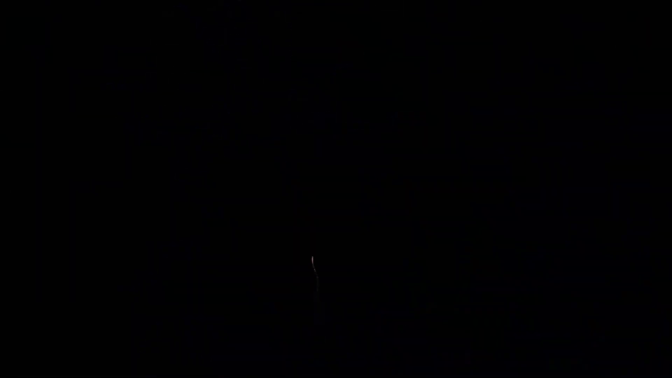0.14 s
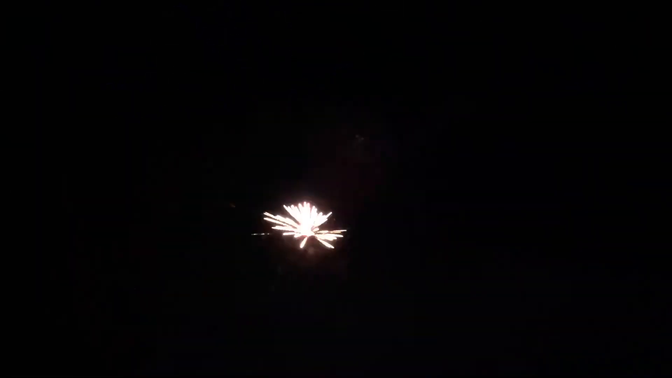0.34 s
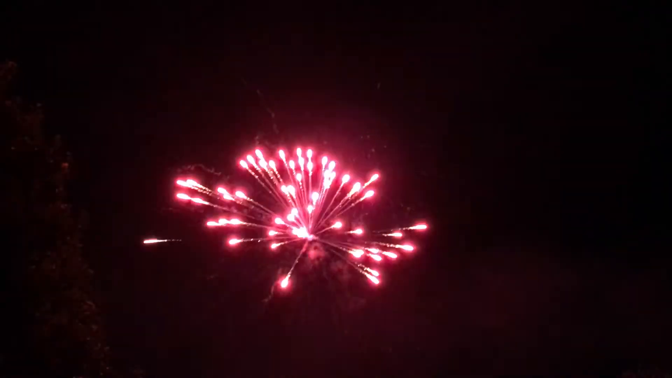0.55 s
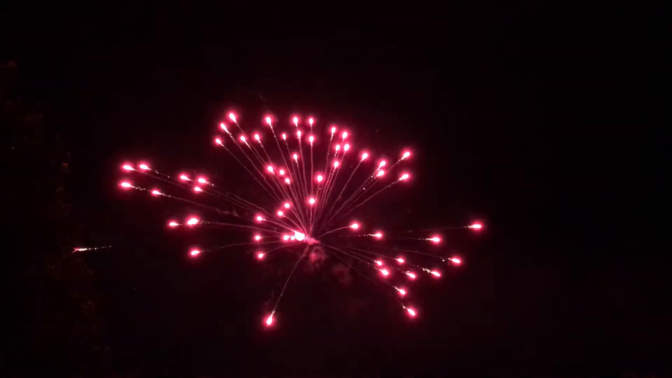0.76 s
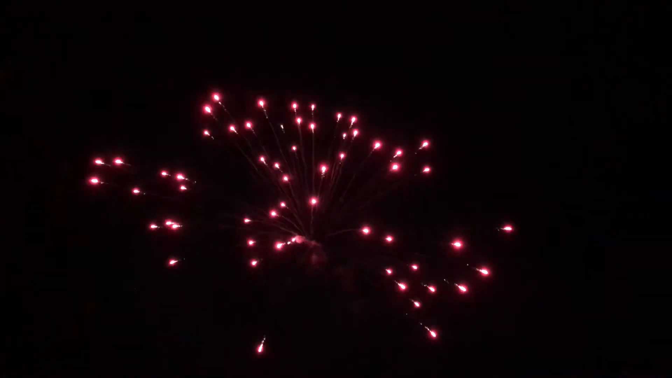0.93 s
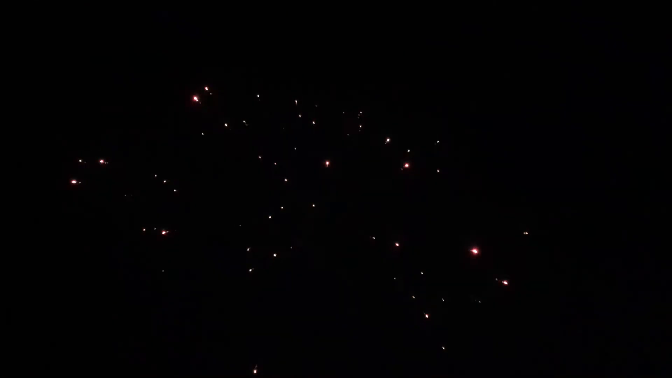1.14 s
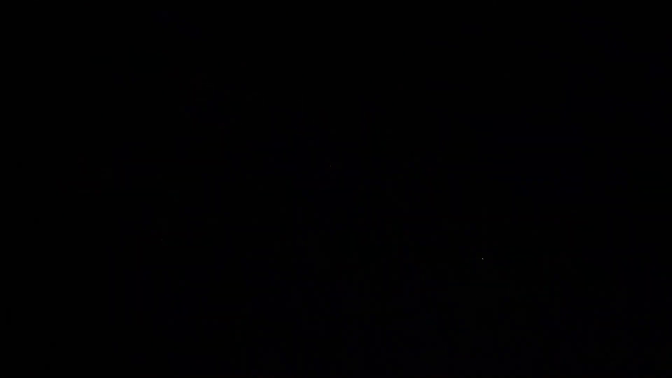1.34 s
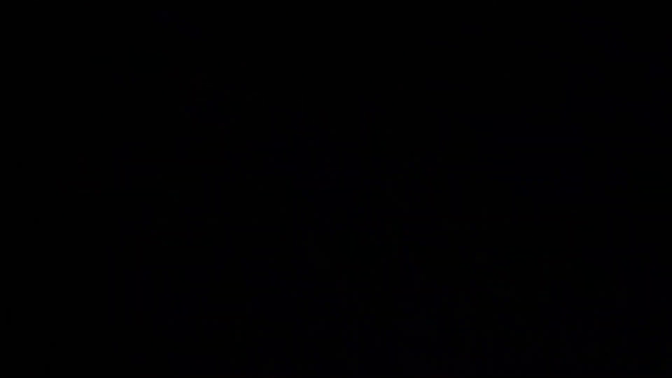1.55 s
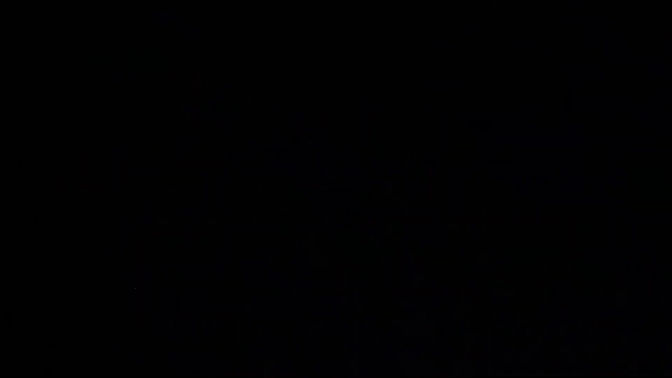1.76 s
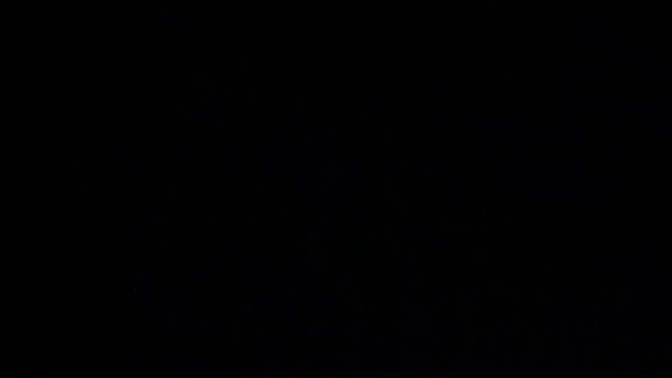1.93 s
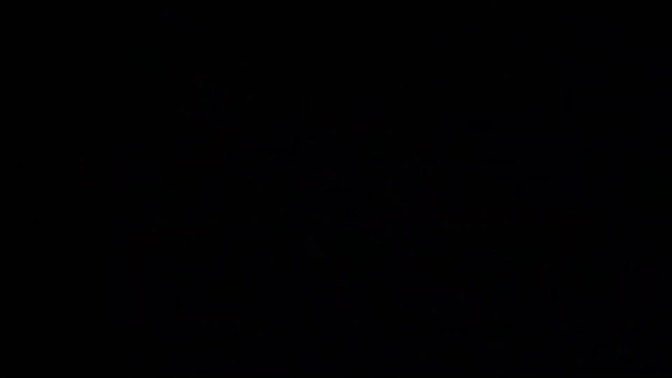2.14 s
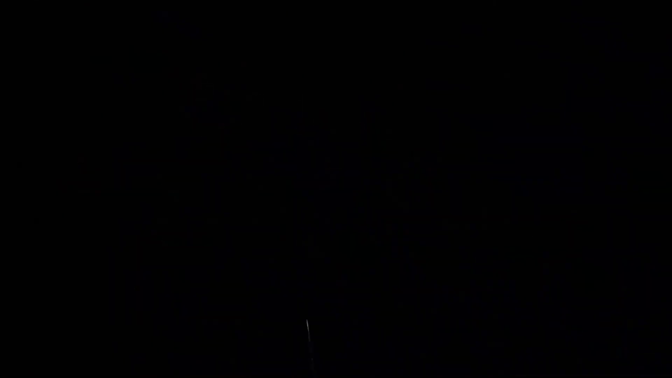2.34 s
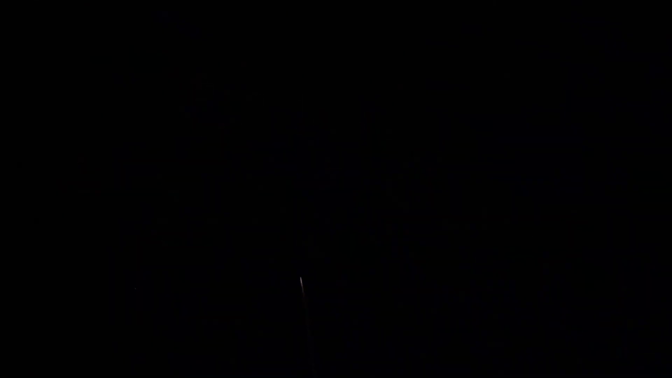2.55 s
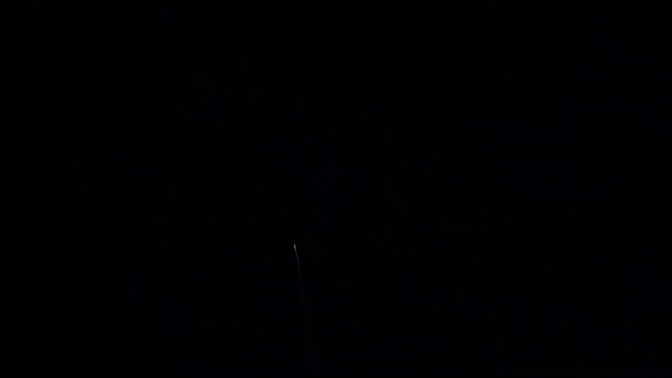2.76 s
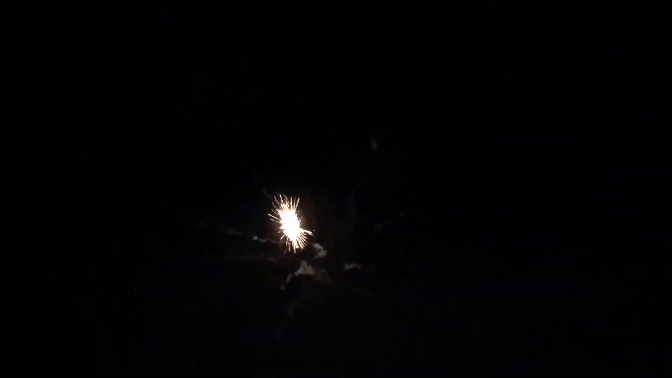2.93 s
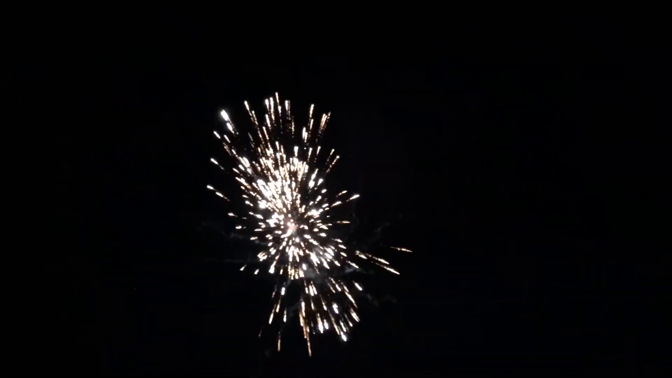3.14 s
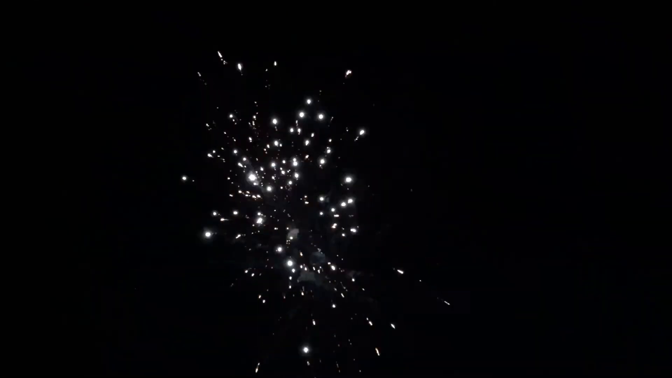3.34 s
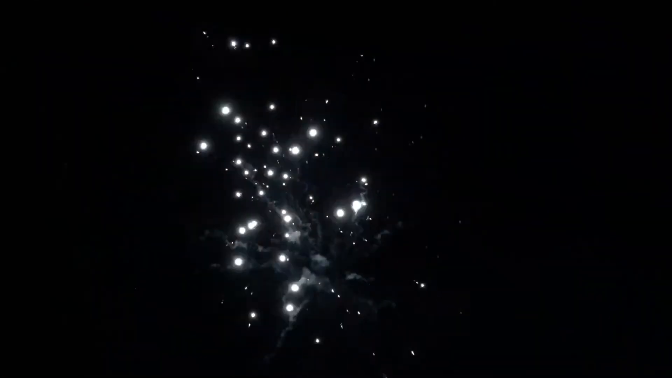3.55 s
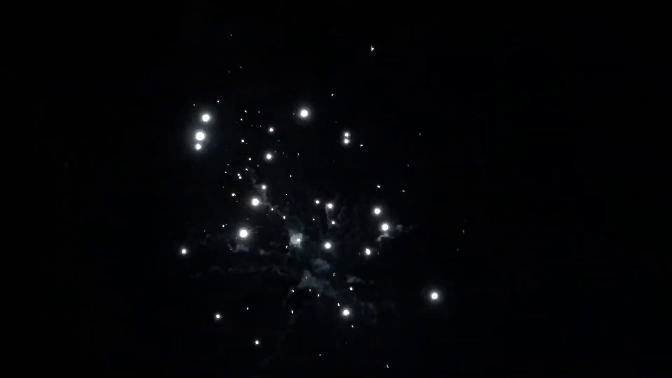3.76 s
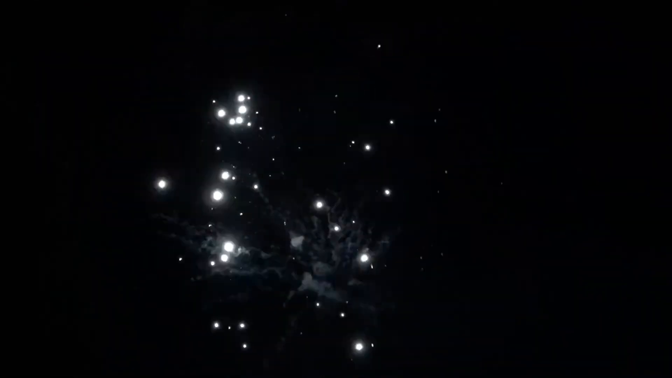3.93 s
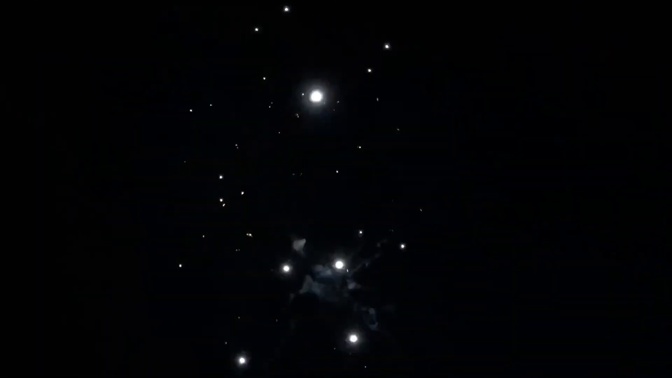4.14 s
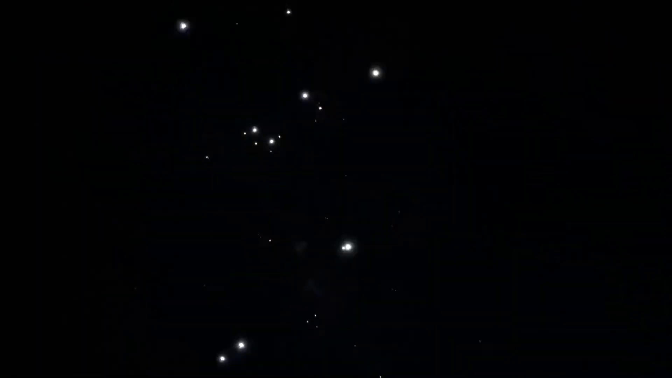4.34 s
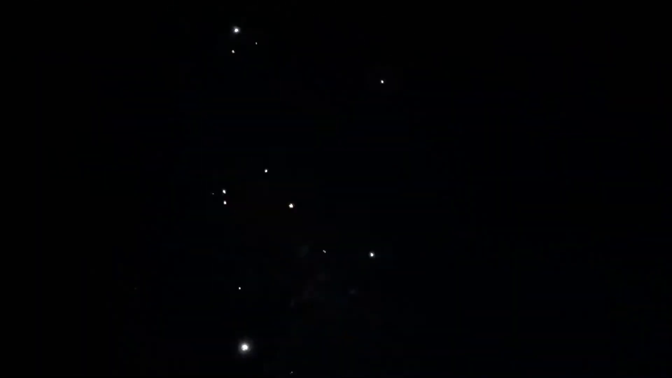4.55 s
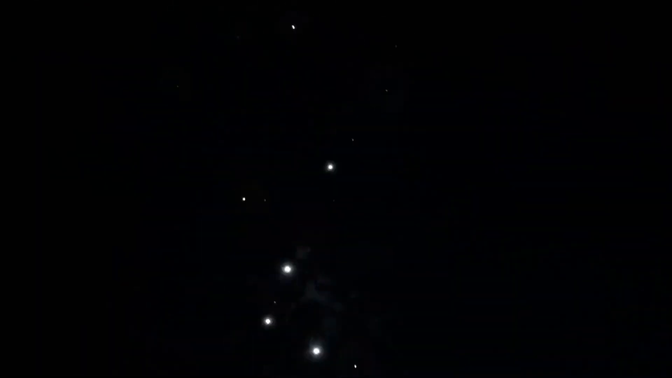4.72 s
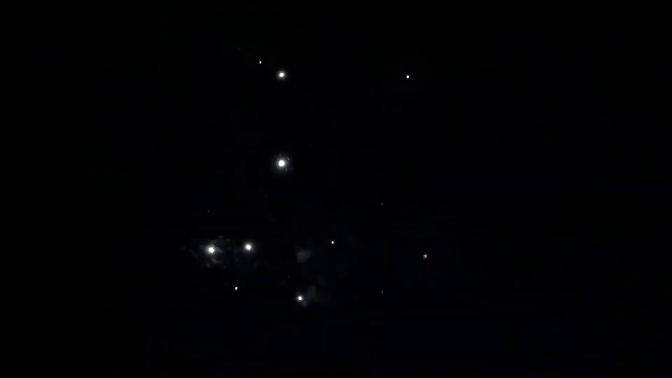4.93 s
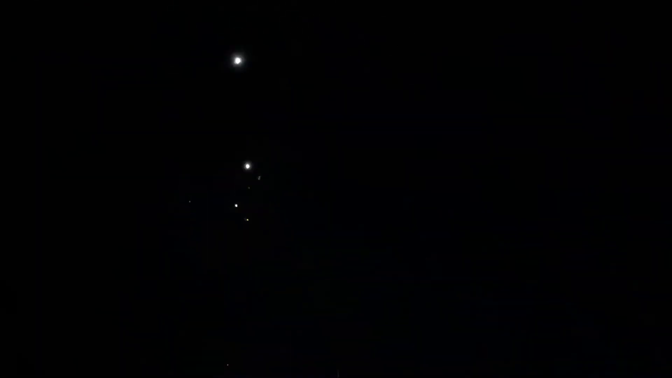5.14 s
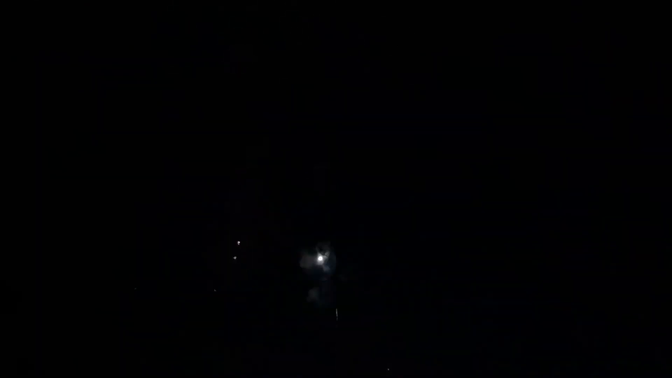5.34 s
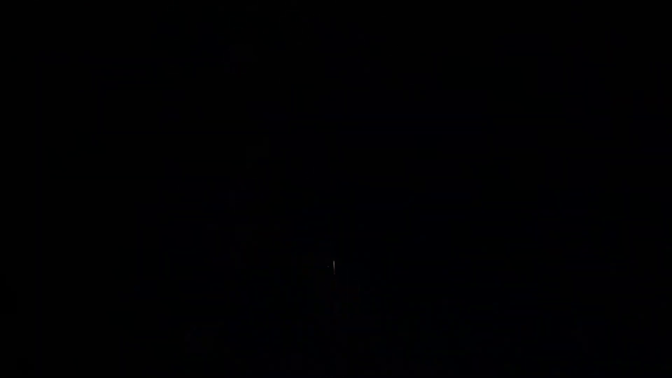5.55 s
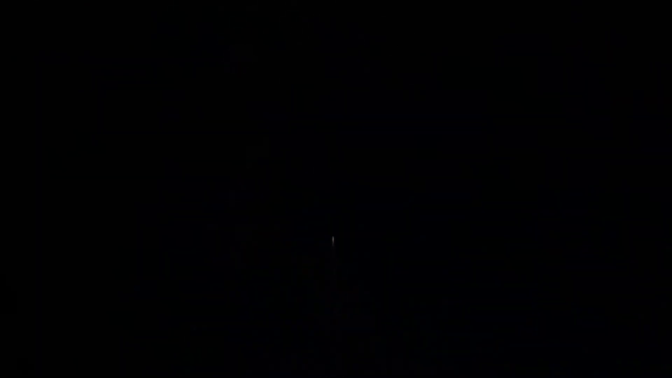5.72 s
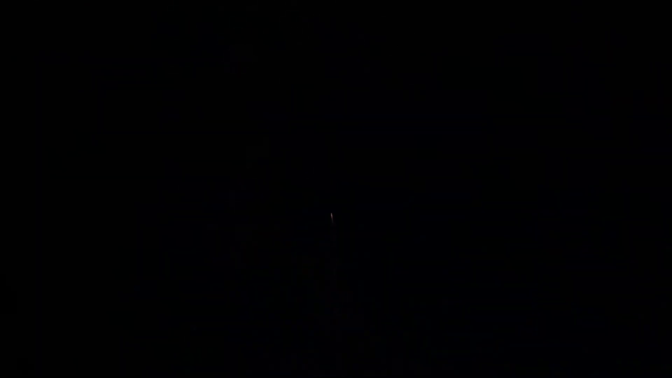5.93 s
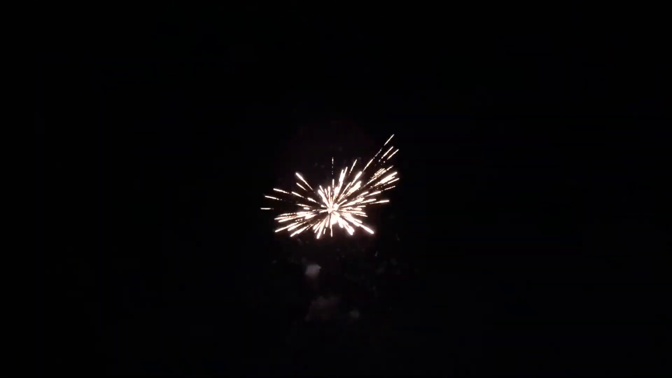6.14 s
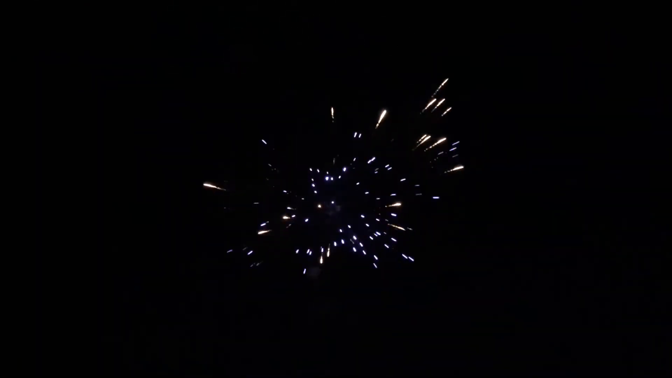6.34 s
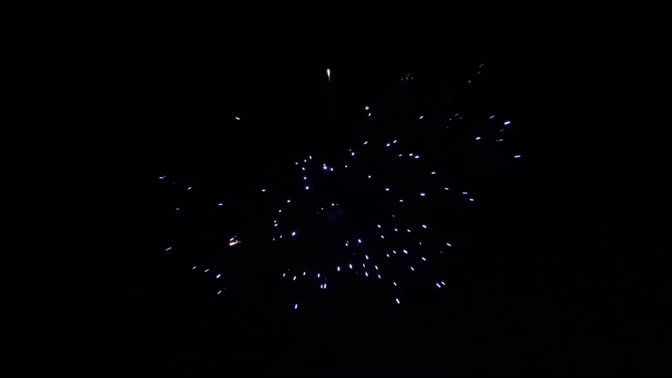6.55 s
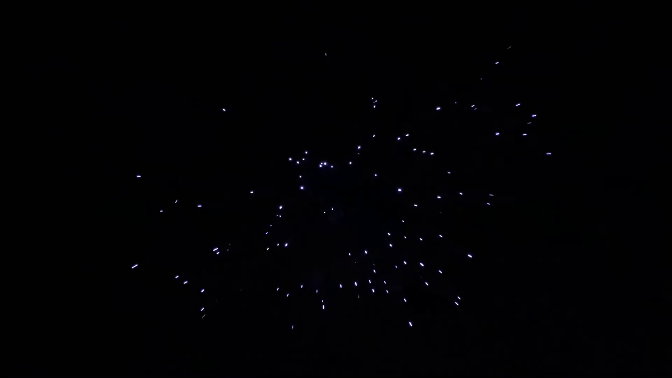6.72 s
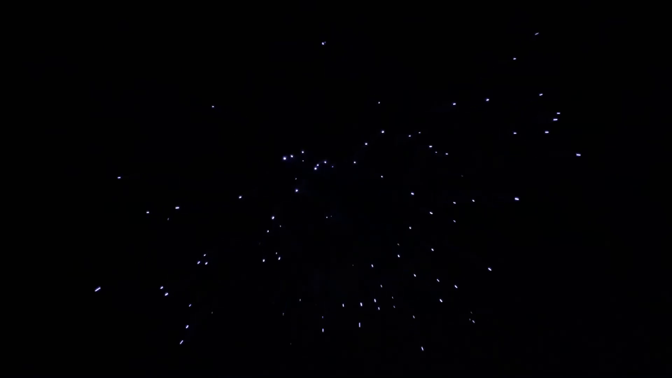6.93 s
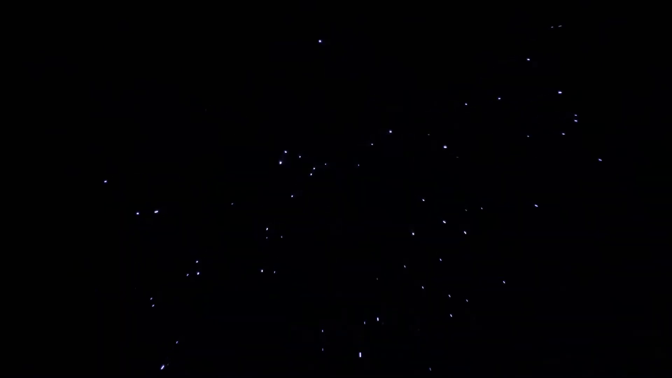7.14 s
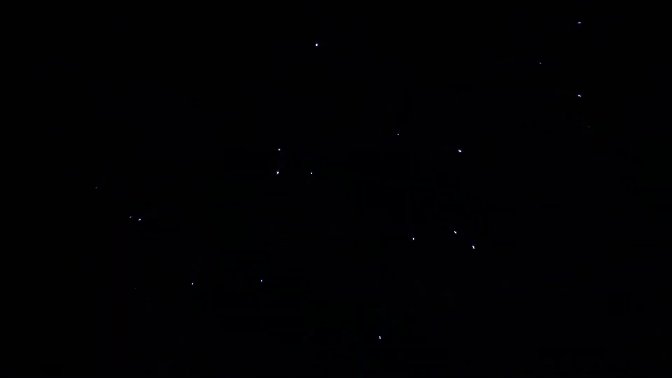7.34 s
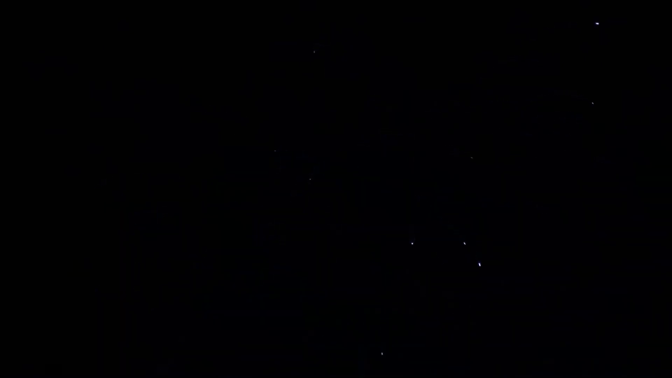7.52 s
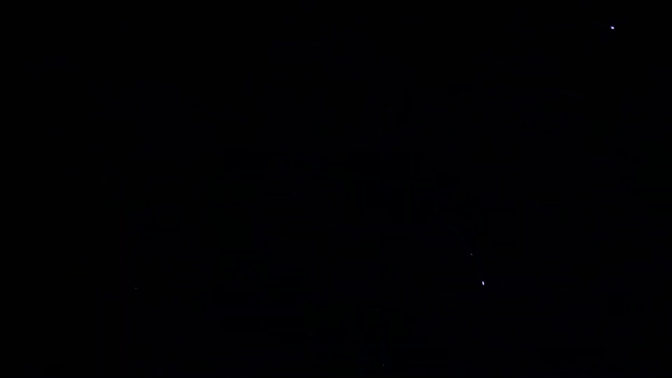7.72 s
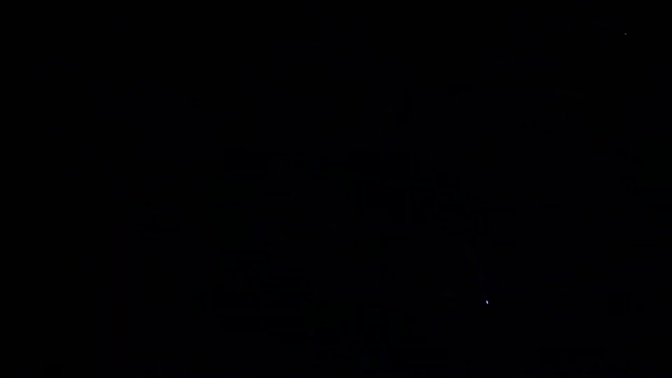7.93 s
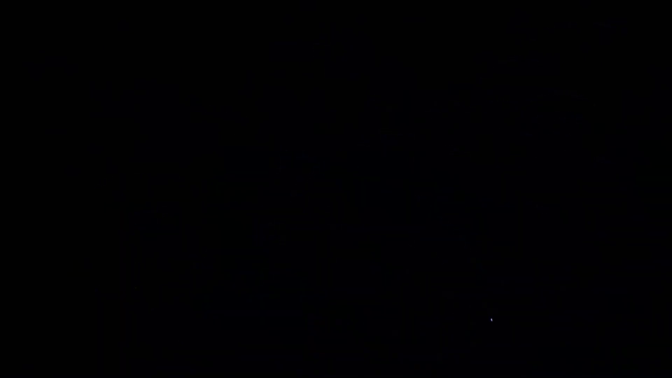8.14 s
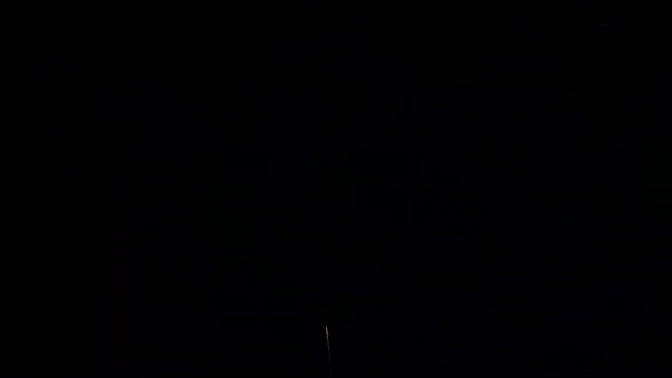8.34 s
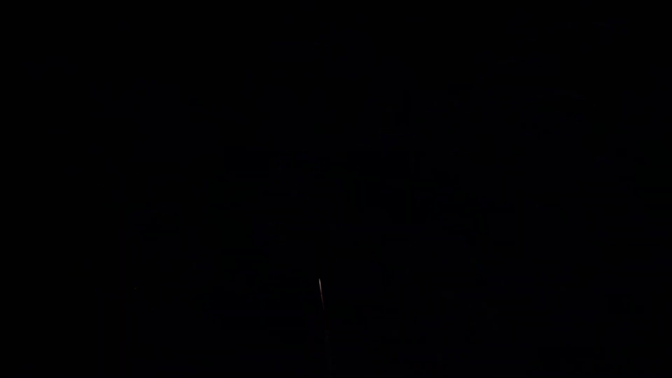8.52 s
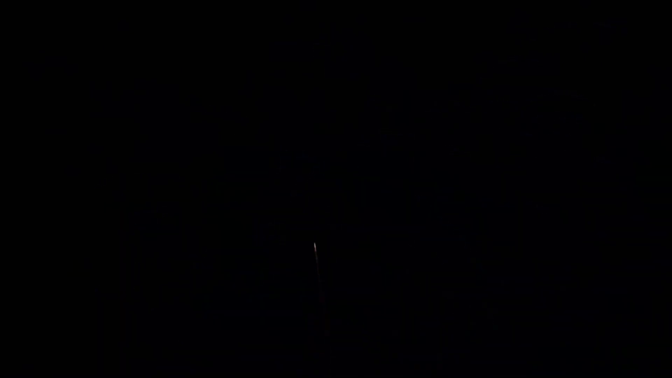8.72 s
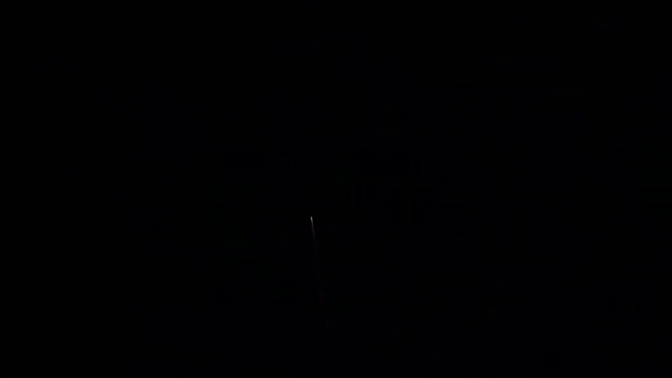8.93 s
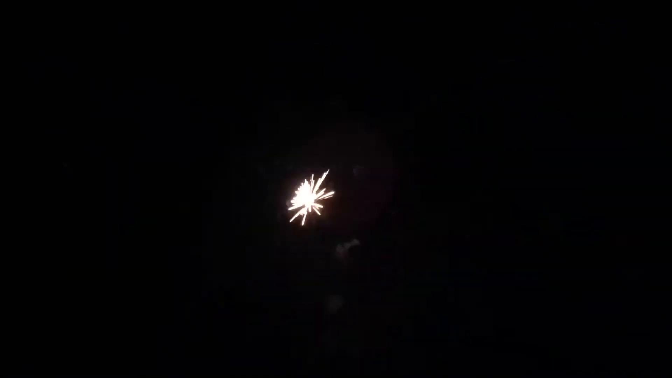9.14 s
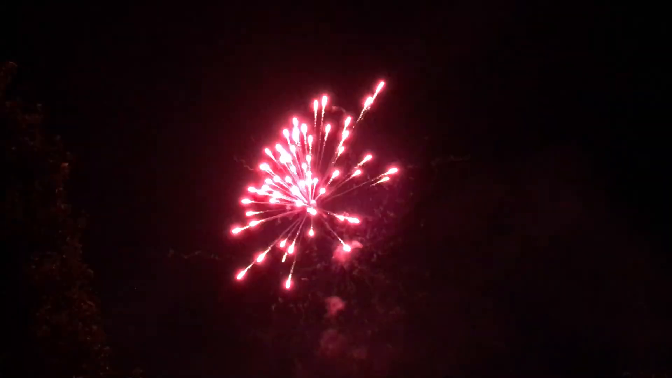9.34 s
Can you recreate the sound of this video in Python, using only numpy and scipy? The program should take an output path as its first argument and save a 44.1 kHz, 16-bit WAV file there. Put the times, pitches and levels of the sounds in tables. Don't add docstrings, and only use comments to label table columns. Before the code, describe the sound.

A fireworks cake fires outdoors at night. Four shells burst about three seconds apart, each a sharp crack with a deep boom and short roar, then rolling echoes from houses and trees. Between them come three hard, dry launch thumps with a wall slap. Distant fireworks thud softly, and bits of ash tick. A single-channel microphone overloads on peaks, and its faint hiss dips after every burst.

```python
import sys
import numpy as np
from scipy import signal
from scipy.io import wavfile
from scipy.ndimage import uniform_filter1d

SR = 44100
rng = np.random.default_rng(int(sys.argv[2]) if len(sys.argv) > 2 else 0)


def undo_db(level):
    steps = np.asarray(level, float) / 20
    return 10 ** steps


def output_pcm(signal):
    pcm = np.clip(np.atleast_2d(signal).T, -1, 1) * 32767
    wavfile.write(sys.argv[1], SR, np.round(pcm).astype(np.int16))


N = 418068


def evened(x):
    return x / np.sqrt(np.mean(x ** 2) + 1e-20)


def read_curve(points, hz):
    f, value = np.transpose(points)
    return np.interp(np.log(hz + 1), np.log(f + 1), value)


def add(mix, s, sound):
    part = mix[round(s * SR):][:len(sound)]
    part += sound[:len(part)]


def smooth_twice(x, size):
    return uniform_filter1d(uniform_filter1d(x, size), size)


def ring(hz, t60, count=6000):
    t = np.arange(count) / SR
    return np.sin(2 * np.pi * hz * t) * undo_db(-60 * t / t60)


def snap(hz):
    t = (np.arange(88) - 44) / SR
    body = (np.pi * hz * t) ** 2
    edge = (np.pi * 2.5 * hz * t) ** 2
    return .75 * (2 * body - 1) * np.exp(-body) + .32 * (2 * edge - 1) * np.exp(-edge)


def puff(hz, spread, t60):
    band = signal.butter(3, [hz / spread, min(hz * spread, 15500)], "band", fs=SR, output="sos")
    t = np.arange(4000) / SR
    noise = evened(signal.sosfilt(band, rng.standard_normal(4000)))
    return noise * undo_db(-60 * t / t60) * np.minimum(t / 0.00048, 1)


def dying(colour, t60s, hold, lumpy_db):
    hz = np.fft.rfftfreq(1024, 1 / SR)
    t = (np.arange(170) - 8) * 128 / SR
    a, b = rng.standard_normal((170, 513, 2)).T
    z = (a + 1j * b) * undo_db(read_curve(colour, hz)[:, None])
    start = np.std(signal.istft(z, nperseg=1024, noverlap=896)[1])
    z *= undo_db(-60 * np.maximum(t - hold, 0) / read_curve(t60s, hz)[:, None])
    sound = signal.istft(z, nperseg=1024, noverlap=896)[1][1024:]
    lumps = evened(uniform_filter1d(rng.standard_normal(len(sound)), 90))
    return sound / start * undo_db(lumpy_db * lumps)


# (level [dB rms], duck [dB], end of duck after the burst [s], recovery [s])
HISS_GAIN = (-59.5, -11, 1.37, 1.57)


def hiss_db():
    level_db, duck_db, held, back = HISS_GAIN
    t = np.arange(N) / SR
    ducks = sum(np.interp(t - s, [0, .1, held - back, held], [0, 1, 1, 0]) for s in BURST_TIMES)
    return level_db + duck_db * ducks


def returns(t, times, strengths_db, echoes, octave):
    delay, spread, db, centre, breadth = np.transpose(echoes)[:, :, None]
    power = undo_db(db - 6.04 * ((octave - centre) / breadth) ** 2) ** 2
    total = 0
    for s, strength_db in zip(times, strengths_db):
        swells = power * np.exp(-((t - s - delay) / spread) ** 2)
        total = total + undo_db(2 * strength_db) * swells.sum(0)
    return total


# (centre [octave], night floor [dB], share of duck [ratio],
# share of far fireworks [ratio], drift [dB])
WASH_BANDS = [
    (0, -51, 0.39, 0.99, 2.1),
    (1.7, -54, 0.094, 0.3, 1.9),
    (3, -57.5, .3, 0.39, 1),
    (4.3, -54, 0.099, 0.16, 2.07),
]
# (time [s], level over the floor [dB])
FAR_FIREWORKS = [(0, 9), (.15, 2), (.5, 3), (.9, -5), (1.3, 1.5), (1.65, 0), (2.3, 3), (2.95, 4),
                 (3.5, -2.5), (4.1, 7.5), (4.65, 6), (5.5, 7), (6.0, 1), (6.65, -0.5), (7.45, 4),
                 (8.1, 3.5), (8.5, 1.5), (9.48, -3)]
# (delay [s], spread [s], level [dB], centre [octave], breadth [octaves])
BURST_ECHOES = [(.17, 0.11, -46, 2.4, 2.2), (.265, 0.039, -40, 2.9, 2), (.35, 0.041, -45.5, 2.6, 1.7),
                (.475, .035, -46, 2, 2.04), (0.541, 0.043, -45.5, 3.3, 1.5), (.79, 0.048, -50, 3.1, 2.1),
                (.94, 0.054, -47.5, 0.85, 6), (1.045, .025, -48, 3, 1.5), (1.211, 0.078, -45.5, 1.94, 2.14),
                (1.46, 0.054, -43, 2.15, 1.2), (.98, 0.21, -45, 7.8, 3), (1.42, 0.25, -46, 2.5, 2.9),
                (1.8, 0.24, -45, 2.4, 1.57), (2.586, 0.027, -40.5, 1.65, 1.66)]
LIFT_ECHOES = [(.17, 0.056, -20, 13, 0.52), (.19, 0.044, -38, 0.4, 0.64), (0.268, 0.067, -39.5, 0.48, 1.3),
               (.29, 0.089, -45, 4, 1.5), (.45, 0.24, -52, 4.3, 1.3), (.42, 0.05, -64, 0.42, 0.53),
               (.62, 0.042, -51, 2.2, 2.2), (.82, 0.076, -48.5, 0.63, 1.8), (1.02, 0.028, -52.5, 2.7, 3)]
BURST_RETURNS = [-1.3, -0.73, 0.98, -1.15, 0.1]
LIFT_RETURNS = [-2.1, -0.13, -0.1, -1.1]
FLUTTER = [.6, 1.5, 1.5, .9]


def wash_db():
    t = np.arange(0, N, 256) / SR
    burst_s = [-2.23, *BURST_TIMES]
    lift_s = [-0.636, *(row[0] for row in LIFT_SHOTS)]
    duck_db = hiss_db()[::256] - HISS_GAIN[0]
    far_db = np.interp(t, *np.transpose(FAR_FIREWORKS))
    levels = []
    for octave, floor_db, share, far, drift_db in WASH_BANDS:
        drift = evened(smooth_twice(rng.standard_normal(len(t)), 12))
        power = undo_db(2 * (floor_db + share * duck_db + far * far_db))
        power = power + returns(t, burst_s, BURST_RETURNS, BURST_ECHOES, octave)
        power = power + returns(t, lift_s, LIFT_RETURNS, LIFT_ECHOES, octave)
        levels.append(np.interp(np.arange(N) / SR, t, 10 * np.log10(power) + drift_db * drift))
    flutter = np.clip(evened(smooth_twice(rng.standard_normal(N), 250)), -2, 2)
    return [level + depth_db * flutter for level, depth_db in zip(levels, FLUTTER)]


# (frequency [Hz], level [dB per Hz])
NIGHT_COLOUR = [(30, -38), (45, -2), (70, -0.5), (145, -7.5), (320, -1.5), (550, -10.5), (770, -16.5),
                (1010, -11.5), (1640, -16), (2150, -16), (4900, -34), (6500, -36.5), (9500, -58),
                (12000, -63)]
# (frequency [Hz], level [dB])
CAPSULE_COLOUR = [(4000, 7), (5200, -3), (6500, 0), (7500, -7), (8600, -4.5), (9700, -4.5), (10500, -13),
                  (11500, -6.5), (14000, -12), (15800, -12)]


def night():
    frames, hz = N // 256 + 5, np.fft.rfftfreq(1024, 1 / SR)
    a, b, c, d, patches = rng.standard_normal((frames, 513, 5)).T
    patches = evened(uniform_filter1d(uniform_filter1d(patches, 10, 0), 6, 1))
    flicker = evened(uniform_filter1d(rng.standard_normal(frames), 3))
    wash = (a + 1j * b) * undo_db(read_curve(NIGHT_COLOUR, hz)[:, None] + 0.95 * patches + 1.04 * flicker)
    below = [1 / (1 + (hz / edge_hz) ** 6) for edge_hz in (145, 460, 850)]
    shares = np.diff([0 * hz, *below, 0 * hz + 1], axis=0)
    hiss_colour = undo_db(read_curve(CAPSULE_COLOUR, hz)) / (1 + (3500 / (hz + 1)) ** 4)
    hiss = (c + 1j * d) * hiss_colour[:, None]
    fields = [*(wash * share[:, None] for share in shares), hiss]
    out = np.zeros(N)
    for db, field in zip([*wash_db(), hiss_db()], fields):
        out += undo_db(db) * evened(signal.istft(field, nperseg=1024, noverlap=768)[1][:N])
    return signal.sosfilt(signal.butter(6, 42, "high", fs=SR, output="sos"), out)


# (time [s], peak level [dB], centre [Hz], edge level [dB])
FAR_THUDS = [(0.324, -32, 330, -42), (0.786, -30, 507, -29), (0.99, -31, 338, -36),
             (1.578, -31, 540, -31.5), (2.049, -24.5, 610, -46), (2.26, -40, 420, -34),
             (2.532, -33, 86, -40),  (3.101, -33, 438, -45), (3.42, -29, 867, -42),
             (3.445, -27.5, 326, -46), (3.606, -32, 178, -40), (4.185, -32, 546, -31),
             (4.333, -26.5, 397, -40), (4.594, -24.5, 573, -35), (5.008, -24, 88.8, -47),
             (5.067, -42, 97, -34), (5.218, -27, 80, -44), (5.706, -34, 330, -33), (5.734, -25, 270, -31),
             (6.507, -38, 447, -47), (6.682, -32, 535, -38), (6.72, -37, 150, -52), (6.75, -29.5, 536, -43),
             (6.785, -35, 480, -44), (7.024, -42, 490, -47), (7.19, -32, 311, -43), (7.39, -33, 520, -36),
             (7.694, -28, 589, -28), (8.797, -32.5, 490, -41)]
# (frequency [Hz], t60 [s])
THUD_DECAY = [(80, 0.17), (600, 0.078)]


def far_thuds():
    out = np.zeros(N)
    for s, db, hz, edge_db in FAR_THUDS:
        knock = ring(hz, read_curve(THUD_DECAY, hz), count=4000) * np.minimum(np.arange(4000) / 40, 1)
        add(out, s, undo_db(db - 2) * knock + undo_db(edge_db - 5.0) * puff(820, 1.69, 0.066))
    return out


# (time [s], level [dB], frequency [Hz], t60 [s])
EARLY_KNOCKS = [(.5228, -1.5, 338, 0.018), (.527, -17, 2000, 0.11), (.528, -29, 2880, 0.075),
                (3.139, -0.5, 355, 0.055), (3.139, -16, 1760, 0.082), (3.1452, -3.5, 288, 0.057),
                (6.247, -21, 2180, 0.19), (6.249, -27, 3000, 0.089), (6.248, -20, 430, 0.036),
                (6.2512, 1, 270, 0.017), (9.3336, -15, 350.4, 0.024), (9.339, -5, 350, 0.018),
                (9.338, -23, 2140, 0.055)]
# (time [s], level [dB])
FIRST_FRONTS = [(0.516, -29), (3.1262, -29), (3.1305, -33), (3.1407, -33), (6.2343, -31), (6.237, -35),
                (6.2455, -43), (9.321, -27), (9.3255, -29), (9.332, -42)]


def forerunners():
    out = np.zeros(N)
    for s, db, hz, t60 in EARLY_KNOCKS:
        add(out, s, -undo_db(db) * ring(hz, t60) * np.minimum(np.arange(6000) / 25, 1))
    for s, db in FIRST_FRONTS:
        add(out, s - .001, undo_db(db) * snap(4000))
    return out


def splinters(per_s, t60):
    t = np.arange(6000) / SR
    size = undo_db(6.2 * np.minimum(rng.exponential(1, 6000), 3) - 60 * t / t60)
    size = size * rng.choice([-1, 1], 6000)
    return np.convolve(size * (rng.random(6000) < per_s / SR), snap(2600))


# (frequency [Hz], level [dB per Hz])
FACADE_COLOUR = [(500, -40), (1100, 0.5), (1700, 0.5), (3500, -4), (6500, -14.5), (9500, -23.5),
                 (16000, -55)]


def houses(hold, rise):
    answer = dying(FACADE_COLOUR, [(1000, 1.0), (8000, 0.68)], hold, 1.16)
    return answer * np.minimum(np.arange(len(answer)) / SR / rise, 1)


BURST_TIMES = [.5352, 3.1494, 6.2568, 9.3438]
# (crack [dB], dull forerunner [dB], boom [dB], roar [dB], roar hold [s])
BURST_LEVELS = [
    (-6, -16.5, -11.5, -7, 0.0096),
    (-10, -8.5, -6.5, -6, 0.015),
    (-2.5, -15.5, -10.5, -8.5, 0.016),
    (0, -18, -11, -7, 0.011),
]
# (frequency [Hz], level [dB per Hz])
ROAR_COLOUR = [(70, -5), (120, -0.5), (175, -18), (220, 1.5), (280, 0.5), (358, 2.5), (481, -6.5),
               (660, -7.5), (800, -13.5), (1150, -9), (2000, -16), (3300, -22), (9400, -32.5), (16000, -41)]
# (frequency [Hz], t60 [s])
ROAR_DECAY = [(150, 0.2), (700, 0.19), (2000, .22), (6000, 0.32), (14000, 0.24)]
# (frequency [Hz], level [dB per Hz])
SCATTER_COLOUR = [(88, -22), (150, 4), (321, 5), (484, -13), (716, -20.5), (854, -17.5), (1210, -6.5),
                  (1390, -8.5), (1940, -9), (3350, -15.5), (4160, -20.5), (8560, -29.5), (16000, -42.5)]
# (frequency [Hz], t60 [s])
SCATTER_DECAY = [(200, 0.21), (600, .15), (1500, 0.29), (6000, 0.4), (14000, 0.25)]


def burst(s, crack_db, lead_db, boom_db, roar_db, hold):
    out, before = np.zeros(N), np.arange(1060)[::-1] / SR
    band = signal.butter(3, [220, 520], "band", fs=SR, output="sos")
    dull = evened(signal.sosfilt(band, rng.standard_normal(3060))[2000:])
    swell = undo_db(lead_db - 580 * before)
    add(out, s - .024, swell * dull * signal.windows.tukey(1060, .2))
    early = dying(SCATTER_COLOUR, SCATTER_DECAY, 0.0068, 0.55)[:1060]
    add(out, s - .024, undo_db(-34.5) * early * signal.windows.tukey(1060, .3))
    roar = dying(ROAR_COLOUR, ROAR_DECAY, hold, 2.3)
    add(out, s - .001, -undo_db(crack_db) * snap(2530))
    add(out, s - .001, -undo_db(crack_db - 3) * snap(7100))
    add(out, s + 0.001, -undo_db(-9.5) * ring(358, 0.16))
    add(out, s + 0.00004, -undo_db(-7) * ring(675, 0.08))
    add(out, s + .09, undo_db(roar_db - 34.0) * houses(0.16, 0.15))
    near_walls = houses(.012, 0.005) * undo_db(np.arange(len(roar)) * -.006)
    add(out, s + .012, undo_db(roar_db - 23.5) * near_walls)
    add(out, s, undo_db(-28) * splinters(450, .2))
    boom = ring(60, .5, count=2000) * signal.windows.tukey(2000, .6)
    add(out, s + .0045, -undo_db(boom_db) * boom)
    add(out, s + 0.0056, -undo_db(roar_db) * ring(218.0, 0.114))
    add(out, s, undo_db(roar_db) * roar)
    return out


# (time [s], crack [dB], thump [dB], ground echo delay [s], scatter [dB])
LIFT_SHOTS = [
    (1.7529, -1, 2, 0.0019, -13.5),
    (4.7516, -0.5, 2, 0.0022, -11.5),
    (7.83, 2, 3.5, .0022, -12.5),
]
# (frequency [Hz], signed size [ratio], t60 [s])
TUBE_MODES = [(89.3, 0.19, 0.17), (183, 0.63, 0.039), (268, -1.45, 0.007)]
# (frequency [Hz], level [dB], t60 [s])
YARD_MODES = [(1080, -32, 0.0043), (2510, -6, 0.011), (3590, -9, 0.013)]


def lifts():
    out = np.zeros(N)
    thump = sum(size * ring(hz, t60) for hz, size, t60 in TUBE_MODES)
    thump = uniform_filter1d(np.pad(thump, (60, 0)), 50)[30:]
    fence = ring(1684, 0.016, count=900) * np.minimum(np.arange(900) / 110, 1)
    walls = sum(undo_db(db) * ring(hz, t60) for hz, db, t60 in YARD_MODES)
    for s, crack_db, thump_db, ground, scatter_db in LIFT_SHOTS:
        lead_in = dying(SCATTER_COLOUR, SCATTER_DECAY, .02, 1.5)[:400] * undo_db(np.arange(-399, 1) * .07)
        add(out, s - 400 / SR, undo_db(-19.5) * lead_in)
        add(out, s - .001, undo_db(crack_db) * snap(3300))
        add(out, s - .001, undo_db(crack_db - 15) * snap(9000))
        add(out, s - .001 + ground, undo_db(crack_db - 6) * uniform_filter1d(snap(2500), size=3))
        add(out, s + ground, walls)
        add(out, s + 0.0008, undo_db(thump_db) * thump)
        add(out, s + 0.0163, undo_db(thump_db - 6.5) * thump)
        add(out, s + 0.016, undo_db(thump_db - 5.5) * fence)
        add(out, s, undo_db(scatter_db) * dying(SCATTER_COLOUR, SCATTER_DECAY, 0.0019, 1.43))
        add(out, s + .13, undo_db(scatter_db - 25.5) * houses(0.04, 0.044))
    return out


# (time [s], level [dB], centre [Hz], width [ratio])
ASH_TICKS = [
    (2.424, -45, 6650, 0.94),
    (5.561, -53, 4240, 1.4),
    (8.183, -38, 5950, 1.15),
    (8.622, -48, 3000, 1.2),
    (8.686, -50, 4800, 1),
]


def ash():
    out = np.zeros(N)
    for s, db, hz, spread in ASH_TICKS:
        add(out, s, undo_db(db + 0.5) * puff(hz, max(spread, 1.1), 0.017))
        add(out, s, undo_db(db + 10) * snap(hz))
    return out


def scene():
    bursts = sum(burst(s, *row) for s, row in zip(BURST_TIMES, BURST_LEVELS))
    return (night() + far_thuds() + forerunners() + bursts + lifts() + ash())[None]


def band_limit(x):
    return signal.sosfilt(signal.butter(12, 16500, fs=SR, output="sos"), x)


def record(dry):
    heard = signal.sosfilt(signal.butter(2, 24, "high", fs=SR, output="sos"), dry)
    soft = heard / (1 + abs(heard / .95) ** 5) ** (1 / 5)
    lowpass = signal.firwin(511, 15880, window=("kaiser", 8), fs=SR)
    soft = signal.oaconvolve(soft, lowpass[None], "same")
    return band_limit(soft)


dry = scene()
out = record(dry)
output_pcm(out)
```